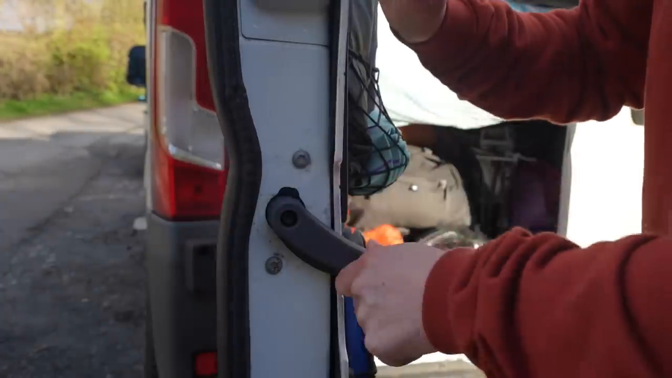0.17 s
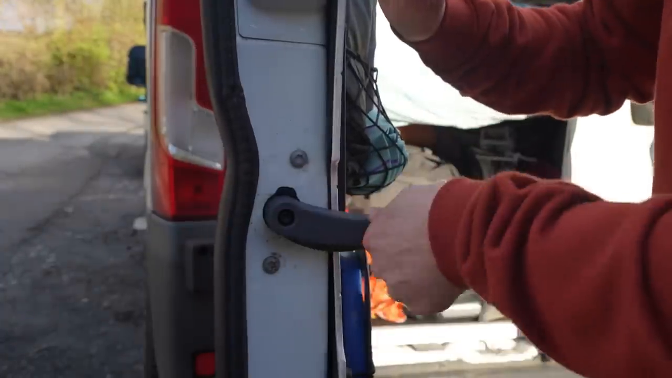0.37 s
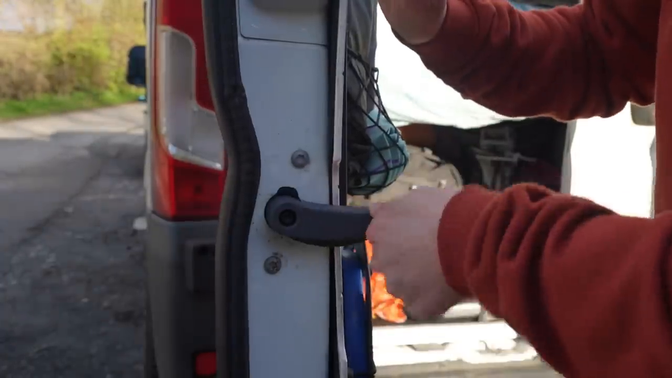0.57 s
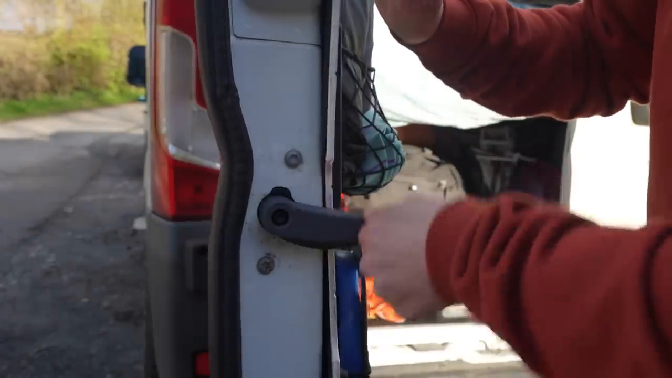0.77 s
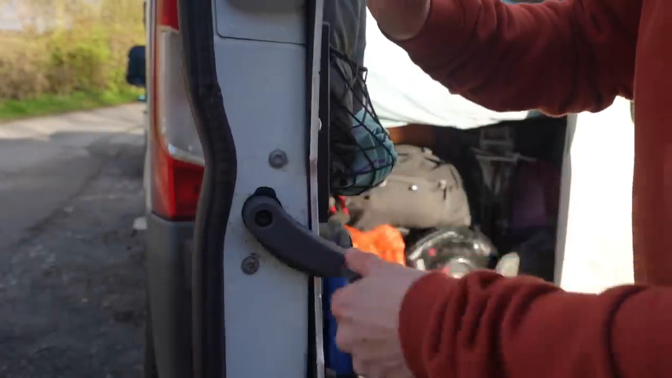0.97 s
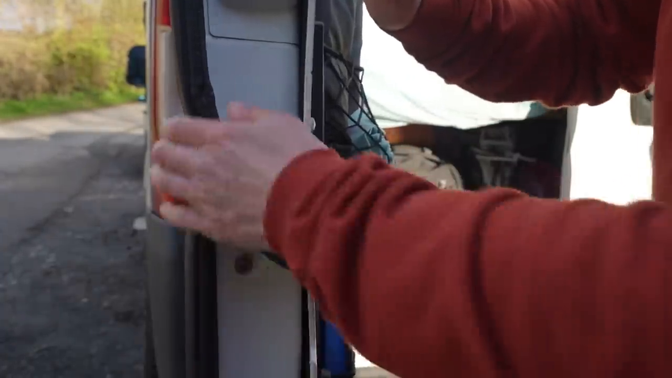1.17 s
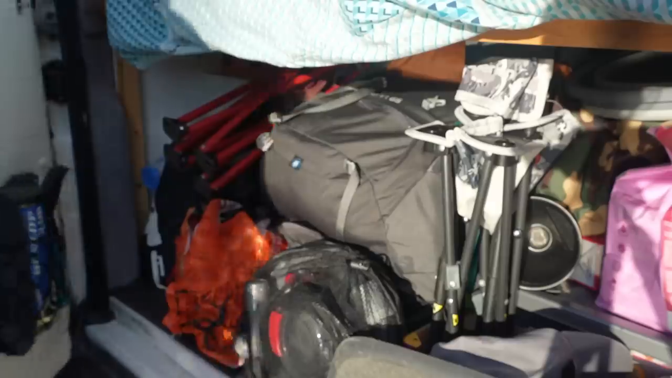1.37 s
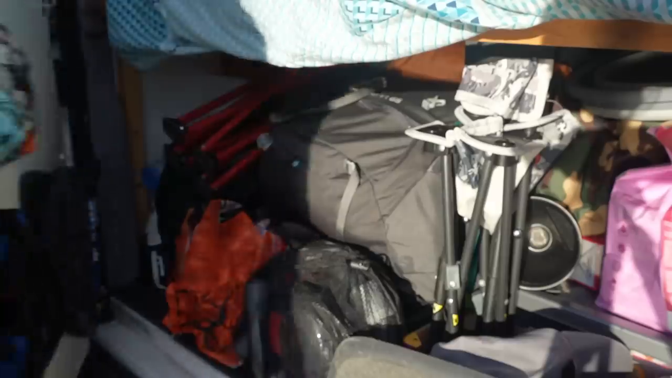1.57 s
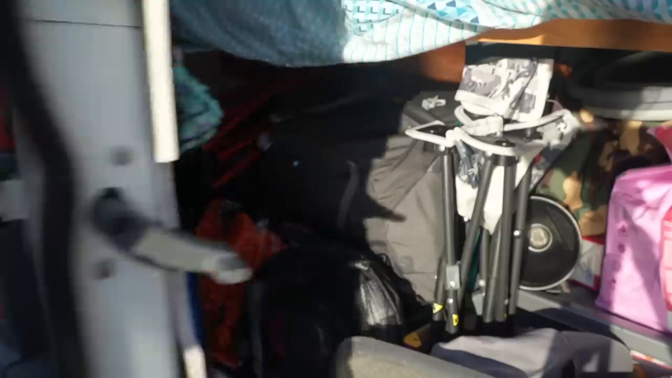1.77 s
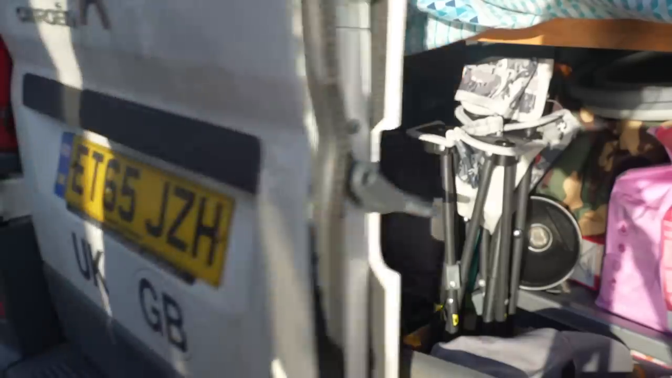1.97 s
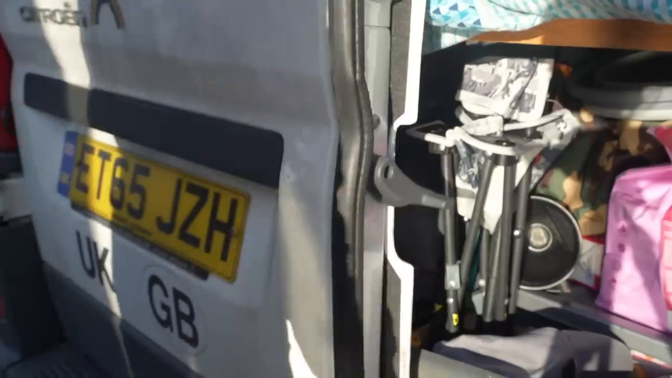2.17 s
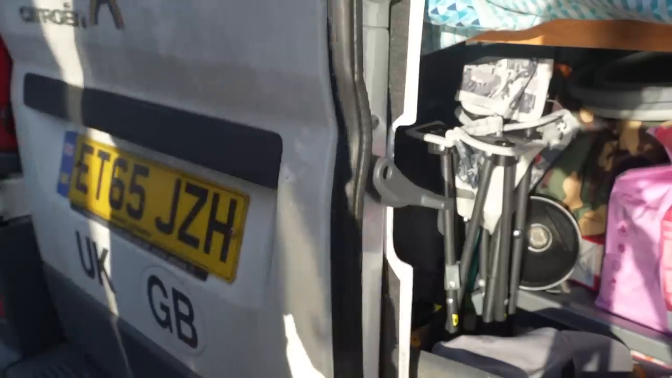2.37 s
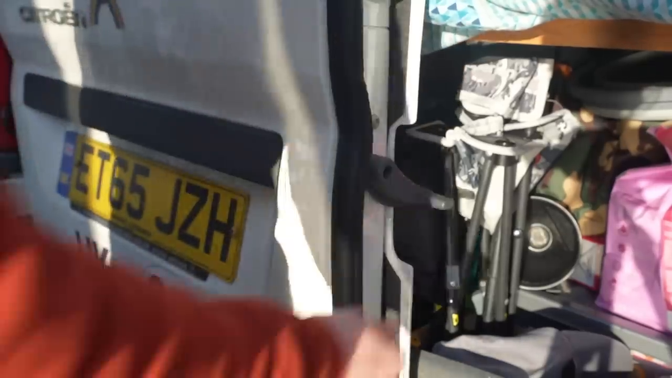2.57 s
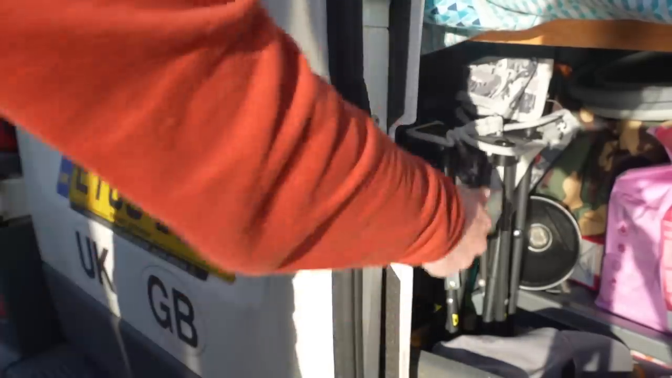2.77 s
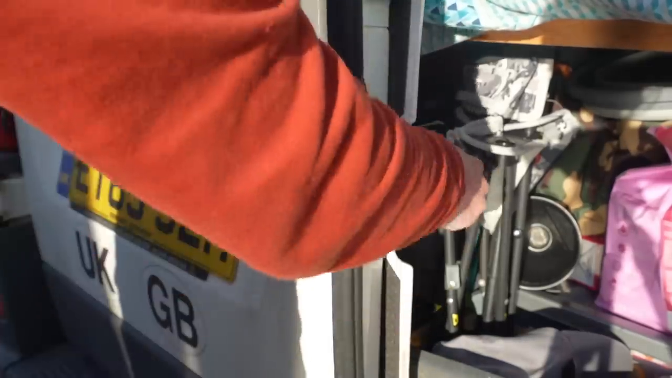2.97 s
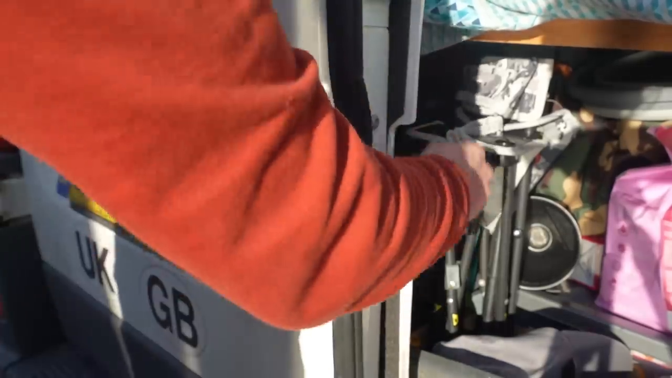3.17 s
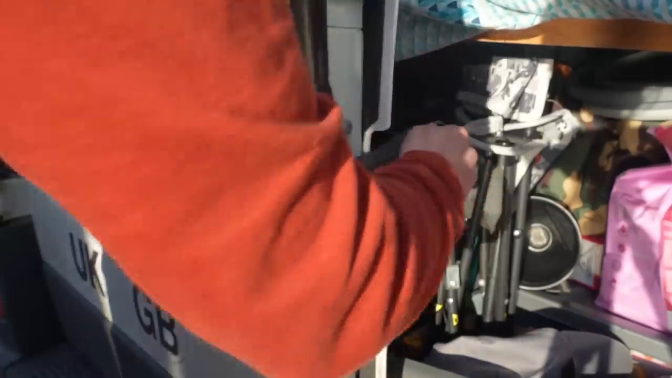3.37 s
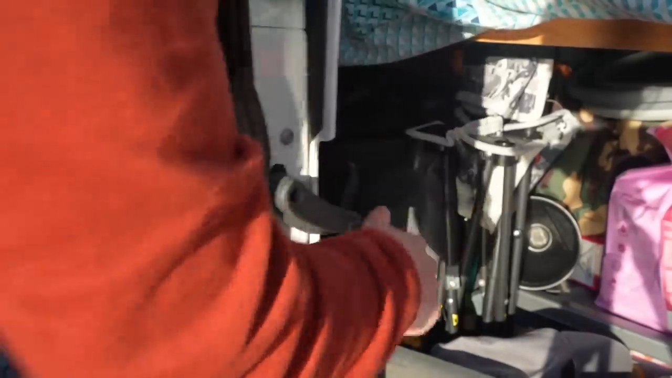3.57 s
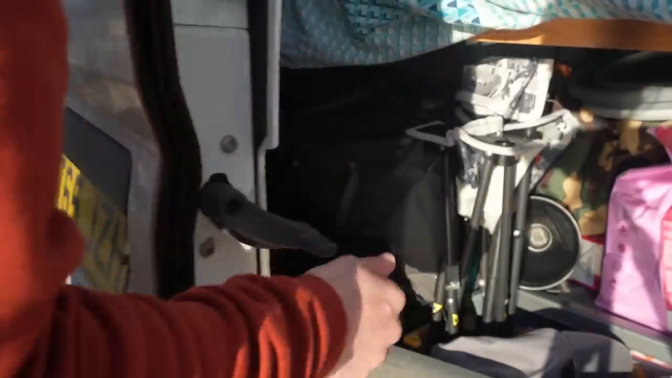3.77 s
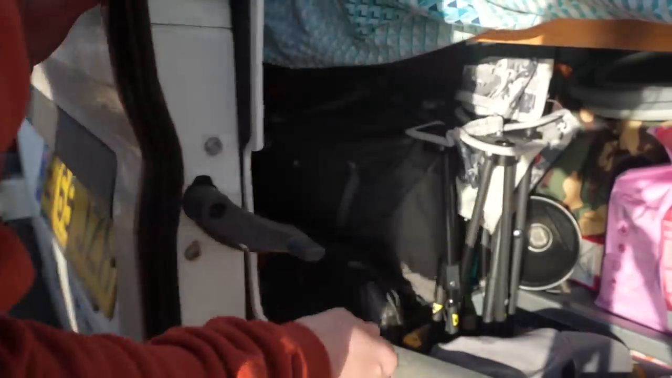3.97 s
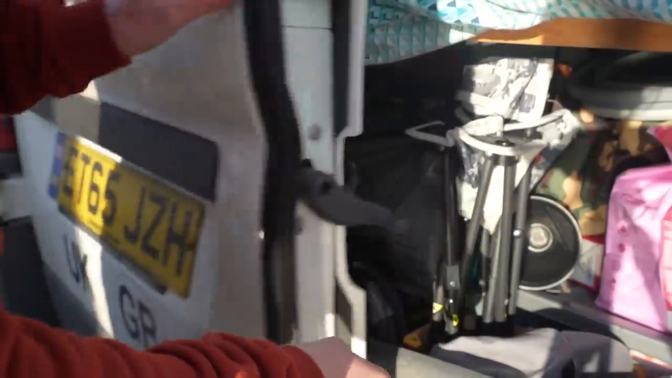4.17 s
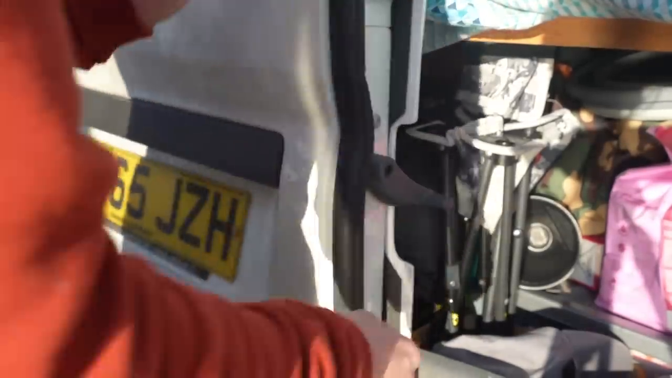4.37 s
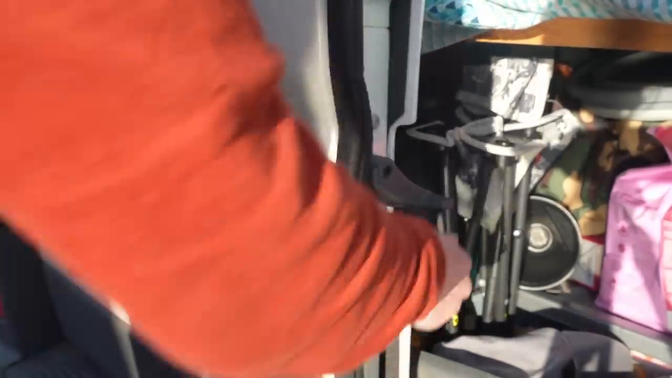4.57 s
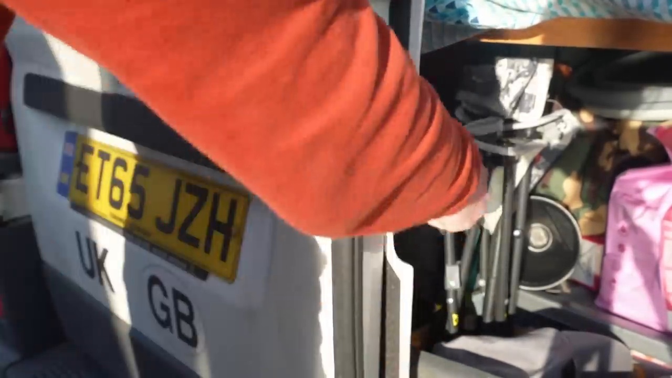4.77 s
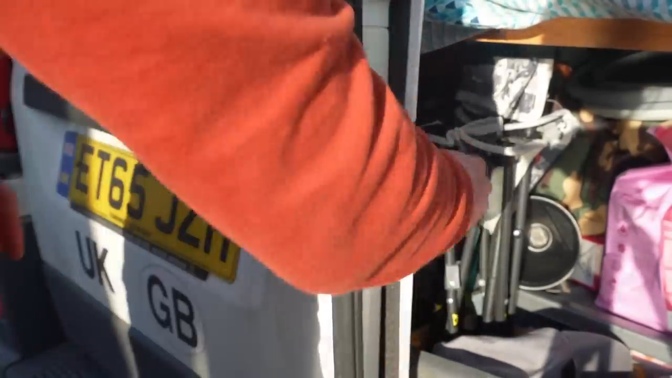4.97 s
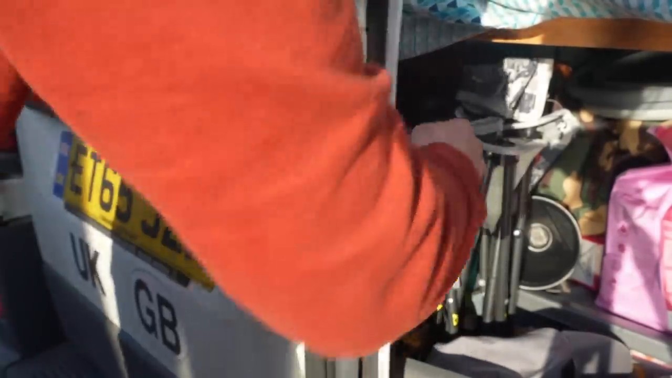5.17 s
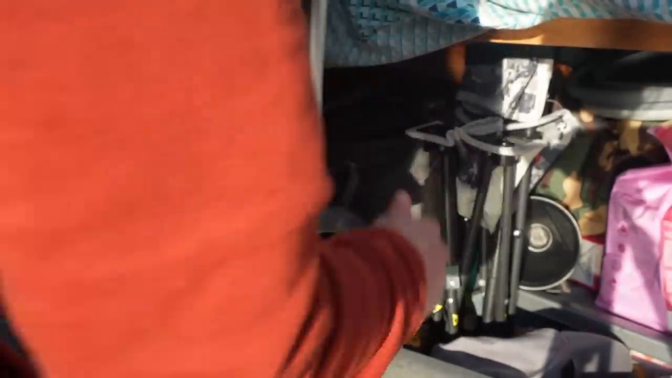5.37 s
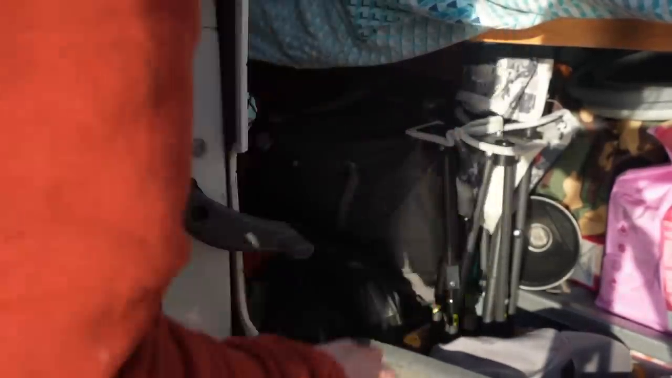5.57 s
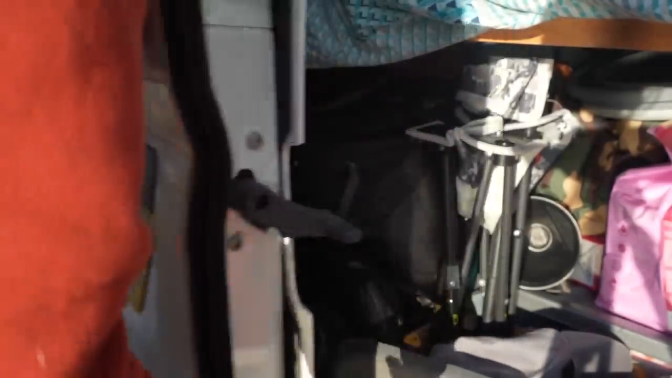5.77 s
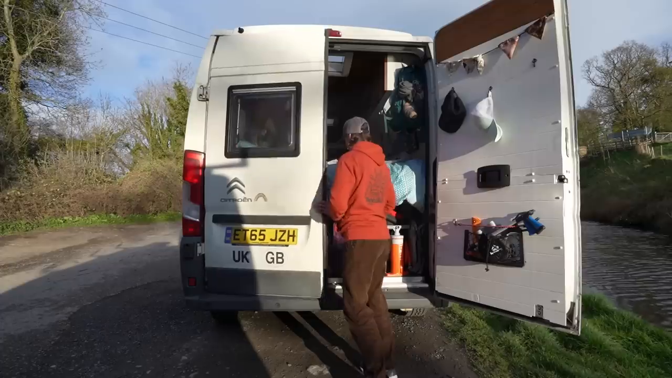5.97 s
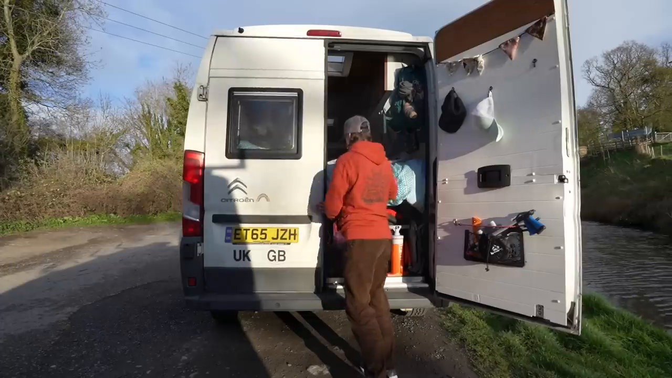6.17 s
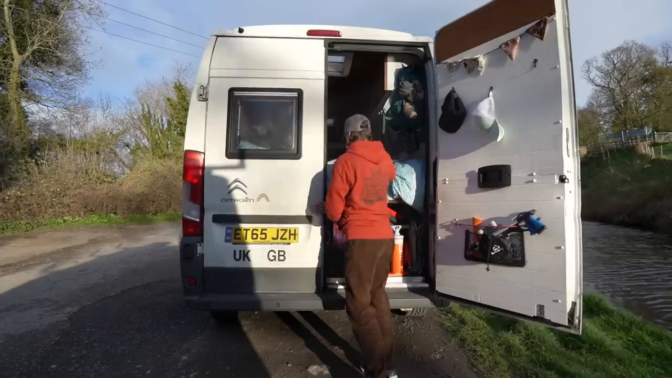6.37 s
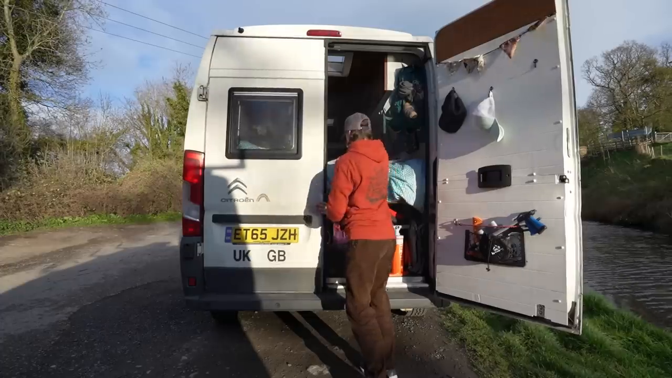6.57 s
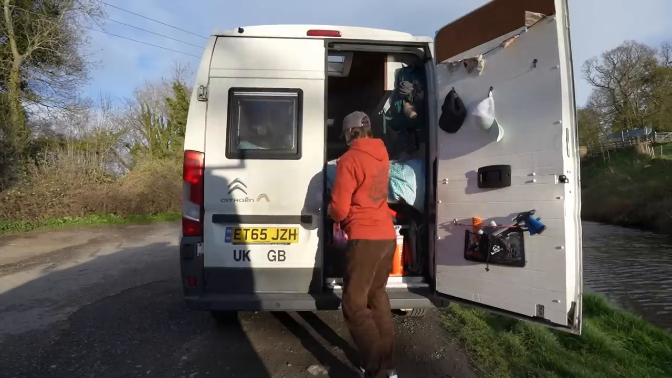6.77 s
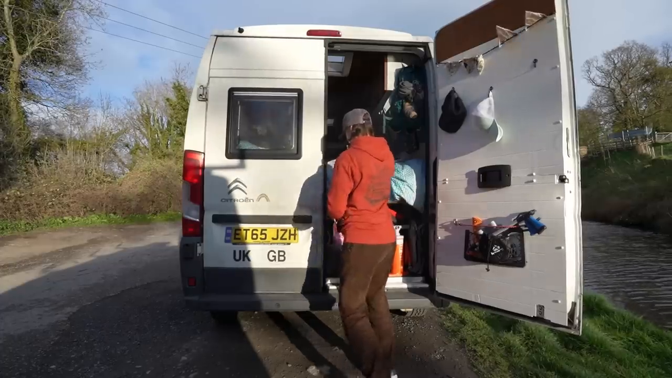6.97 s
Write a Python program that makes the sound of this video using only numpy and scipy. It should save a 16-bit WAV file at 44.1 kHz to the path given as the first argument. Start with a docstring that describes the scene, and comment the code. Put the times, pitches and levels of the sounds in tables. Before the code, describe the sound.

From 0 to 1.3 s, lumpy wind rumbles on the microphone over soft outdoor wash, strongest after 0.9 s, while a van's rear door handle is worked twice close by: dry metal clicks, small clunks and brief rubs, clearest near 0.35, 0.67 and 0.98 s. The wind cuts dead at about 1.29 s, leaving quiet air and a faint tick at 1.57. At 2.03-2.2 s the door slams hard, a cluster of bright latch cracks, rattle and panel thump. The handle unlatches sharply at 3.22, with looser clunks until 3.6. A second slam hits at 4.3-4.45, followed by another crisp unlatch at 5.08 and softer clacks around 5.35. At 5.92 the airy wash steps up; a farther, duller, boomy slam lands at 6.17-6.33. Faint tinkles follow at 6.42 and 6.95-7.0 s.

```python
"""Gusty wind and a soft outdoor wash come first, and a van's rear door handle is worked twice in them.
The door is then shut, unlatched and shut again, and shut once more from farther off, with a duller slam.
Knocks are chattering noise bursts sent through latch steel and door panel; thumps and snaps are short
dying tones. Moving parts rattle and rub as shaped noise, and wind and wash are coloured noise.
Small metal pieces, each a few high dying tones, tinkle near the end."""
import sys
import numpy as np
from scipy import signal
from scipy.fft import rfft, irfft
from scipy.io import wavfile
from scipy.ndimage import uniform_filter1d

SR = 44100
rng = np.random.default_rng(int(sys.argv[2]) if len(sys.argv) > 2 else 0)


def log_audio(samples):
    """Write samples as a 16-bit WAV file to the path given in sys.argv[1]."""
    # one column per channel
    frames = np.atleast_2d(samples).T
    # limit to full scale, then quantise
    limited = np.clip(frames, -1, 1)
    pcm = np.round(limited * 32767).astype(np.int16)
    wavfile.write(sys.argv[1], SR, pcm)


N = 309713  # length in samples

# ringing tones of the latch steel under a loose contact:
# pitch_hz, level_db (relative), t60_s (time to die by 60 dB)
LATCH_MODES = [(800, 0.5, 0.0097), (1270, -3.5, .022), (1640, -4, 0.018), (2062, 3, 0.016),
               (2330, 1, 0.018), (2850, -2.5, 0.015), (3390, -2.5, 0.018), (4290, -10.5, 0.02),
               (5950, -12.5, .012), (7230, -8.5, .016), (8160, -14, .012), (10240, -17.5, .008)]


def gain_of(db):
    """Turns decibels into an amplitude factor."""
    return 10 ** (np.asarray(db) / 20)


def evened(x):
    """Scales a sound to an rms of 1."""
    return x / np.sqrt(np.mean(x ** 2) + 1e-20)


def read(points, hz):
    """Reads a spectrum between its points, on a log-frequency axis."""
    point_hz, value = np.transpose(points)
    return np.interp(np.log(hz + 1), np.log(point_hz + 1), value)


def add(mix, s, sound):
    """Mixes a sound in at time s, in seconds."""
    part = mix[..., round(s * SR):][..., :sound.shape[-1]]
    part += sound[..., :part.shape[-1]]


def ringing(x, hz, width_hz):
    """One resonance that keeps the power of wide noise: x is shifted to 0 Hz, smoothed, shifted back."""
    turn = np.exp(2j * np.pi * hz * np.arange(len(x)) / SR)
    r = np.exp(-np.pi * width_hz / SR)
    smooth = signal.lfilter([np.sqrt(2 - 2 * r * r)], [1, -r], x / turn)
    return (turn * smooth).real


def coloured(points, extra_db=0):
    """Steady noise shaped to a given spectrum."""
    hz = np.fft.rfftfreq(N, 1 / SR)
    return irfft(rfft(rng.standard_normal(N)) * gain_of(read(points, hz) + extra_db), N)


def wind():
    """Lumpy low turbulence on the microphone; it stops dead at 1.286 s, where a calmer stretch begins."""
    # gusts: start_s, rumble_db, roar_db (relative to the rumble)
    gusts = [(0, -37.5, -15), (.088, -45.5, 0), (.184, -45.5, -10), (.496, -46.5, -1), (.624, -55, -6),
             (.742, -56, -3), (.82, -60, 7), (.876, -34.5, -10), (.97, -29.5, -9), (1.0, -35.5, 5),
             (1.036, -38.5, -2.5), (1.086, -24.5, -12.5), (1.122, -34.5, -4), (1.204, -26.5, -12),
             (1.286, -28.5, -12.5)]
    # colour of the turbulence: pitch_hz, level_db (per Hz, relative)
    rumble_colour = [(8.8, -13), (15, -2.5), (32, 1), (81, 0), (407, -16.5), (471, -26), (498, -23.5),
                     (632, -29.5), (1200, -37), (1560, -75), (2640, -120)]
    s, rumble_db, roar_db = np.transpose(gusts)
    t, hz = np.arange(N) / SR, np.fft.rfftfreq(N, 1 / SR)
    # rumble lies below about 130 Hz, roar above
    low_db = -10 * np.log10(1 + (hz / 130) ** 6)
    high_db = 10 * np.log10(1 - gain_of(2 * low_db) + 1e-9)
    smooth = uniform_filter1d(uniform_filter1d(rng.standard_normal(N), 900), 900)
    lumps = gain_of(3.4 * evened(smooth))
    rumble = evened(coloured(rumble_colour, low_db))
    roar = evened(lumps * coloured(rumble_colour, high_db))
    gust = rumble + roar * gain_of(np.interp(t, s, roar_db))
    stop = np.clip((s[-1] - t) / 0.00069, 0, 1)
    return gain_of(np.interp(t, s, rumble_db)) * gust * stop


def wash():
    """Far traffic and air in leaves: bass, middle and treble of one noise swell a little apart."""
    # wash, with quick steps near 1.285 s and 5.92 s:
    # time_s, level_db, bass_db, treble_db (last two added to level_db)
    swells = [(0, -50, 10, 6), (.4, -54.5, 10, 10), (.75, -53.5, -2, 8.5), (1.284, -53, -8, 7),
              (1.286, -60.5, 2.5, 7), (1.9, -59, 2, 4.5), (2.7, -59.5, 7.5, 6), (3.1, -59, 0.5, 2),
              (3.9, -61, 3, 2.5), (4.951, -60, 8, 4), (5.6, -61.5, 13.5, 1.5), (5.91, -59, 4, -3.5),
              (5.93, -52.5, 2, 5), (6.6, -52, 0, 4), (7.02, -54, 3.5, 8.5)]
    # colour of the wash: pitch_hz, level_db (per Hz, relative)
    wash_colour = [(12, -43), (20, -20), (142, -9.5), (216, -10.5), (234, -10.5), (399, -11), (446, -13),
                   (607, -11), (698, -14.5), (949, -14), (1060, -14.5), (2750, -24.5), (16000, -57.5)]
    s, level_db, bass_db, treble_db = np.transpose(swells)
    t, hz = np.arange(N) / SR, np.fft.rfftfreq(N, 1 / SR)
    spectrum = rfft(evened(coloured(wash_colour)))
    low = 1 / (1 + (hz / 250) ** 4)
    high = 1 - 1 / (1 + (hz / 3500) ** 4)
    bass, middle, treble = (irfft(spectrum * share, N) for share in (low, 1 - low - high, high))
    flutter = gain_of(2.0 * evened(uniform_filter1d(rng.standard_normal(N), 3000)))
    mix = middle + flutter * bass * gain_of(np.interp(t, s, bass_db))
    mix = mix + treble * gain_of(np.interp(t, s, treble_db))
    return gain_of(np.interp(t, s, level_db)) * mix


def causal(db):
    """Unit-energy response that starts at once, from its dB at 4097 evenly spaced frequencies."""
    mirrored_db = np.concatenate([db, db[-2:0:-1]])
    log_gain = np.log(gain_of(np.maximum(mirrored_db, -100)))
    # the Hilbert transform gives the phase that packs the energy at the start
    taps = np.fft.ifft(np.exp(np.conj(signal.hilbert(log_gain)))).real[:4096]
    return taps / np.linalg.norm(taps)


def bodies():
    """Responses of the latch steel (middle, treble) and of the door panel, a sum of dying modes."""
    # colour of the steel's crack: pitch_hz, level_db (per Hz, relative)
    crack_colour = [(180, -29.5), (300, -1.5), (1230, -4.5), (2000, -8), (3580, -11), (4990, -14.5),
                    (6000, -16), (8640, -20.5), (9550, -25.5), (10600, -27), (16000, -32.5)]
    # modes of the door skin: pitch_hz, width_hz (wider dies sooner), level_db (relative, before width scaling)
    panel_modes = [(72, 40, -11.5), (109, 11, -14), (162, 22, -3), (202, 78, 1.5), (234.6, 70, 2.5),
                   (340, 110, 2), (435, 29, 4.5), (497.5, 12, 0.5)]
    hz, t = np.linspace(0, SR / 2, 4097), np.arange(4096) / SR
    split_db = -10 * np.log10(1 + (hz / 5800) ** 8)
    middle = causal(read(crack_colour, hz) + split_db)
    treble = causal(read(crack_colour, hz) + 10 * np.log10(1 - gain_of(2 * split_db) + 1e-9))
    panel = sum(gain_of(db) * width * np.exp(-np.pi * width * t) * np.sin(2 * np.pi * f * t)
                for f, width, db in panel_modes)
    return middle, treble, panel / np.linalg.norm(panel)


def knocks():
    """Each knock is a blow with dying chatter; it drives the steel and rings at the struck part."""
    # knocks of handle and latch: start_s, level_db (relative), treble_db (relative),
    # ring_hz, ring_db (relative)
    knock_table = [(0.043, -24.5, -23, 2280, -14), (0.052, -24.5, -17, 1350, -15),
                   (0.095, -23, -18.5, 1270, -9), (0.128, -39, -39, 1060, 9.5),
                   (0.324, -28.5, -29, 745, -17), (0.349, -28, -24, 1250, -14),
                   (0.36, -27.5, -13.5, 1290, -3), (0.479, -25.5, -53, 1250, -4),
                   (0.619, -30.5, -23, 1430, -8), (0.648, -26.5, -3.5, 1390, -5),
                   (0.666, -21.5, -10, 1270, 7), (0.795, -21.5, -41, 1200, -29),
                   (0.819, -25.5, -16.5, 1210, -8), (0.966, -29, -2, 2230, -10),
                   (0.981, -23.5, -4, 1240, 10.5), (1.124, -34, -25, 950, -10),
                   (1.18, -29.5, -25, 990, -26), (1.57, -44.5, -17, 1050, -9),
                   (1.983, -30.5, -41.5, 716, 1), (2.035, -10.5, -5.5, 1230, -1.5),
                   (2.055, -7.5, -17.5, 1580, -4.5), (2.063, -11, -8, 1430, -6),
                   (2.095, -3, -23.5, 2700, -7), (2.102, -12, -20.5, 935, -8),
                   (2.117, -4.5, -14, 1950, -22), (2.136, -17, -28.5, 1030, 2.5),
                   (2.169, -24, -53, 1820, 7), (2.183, -5.5, -30, 2970, -5), (2.188, -11.5, -37, 2900, -1),
                   (2.273, -26, -35, 816, -26), (2.322, -27.5, -43, 1410, -10),
                   (2.863, -48.5, -9, 2320, 2.5), (2.931, -31.5, -21, 2180, -4.5),
                   (3.015, -32, -13.5, 1410, -6.5), (3.175, -25, -15, 1440, -5),
                   (3.216, -8.5, -12, 2060, -1.5), (3.234, -4, -7.5, 1910, 3), (3.299, -39, -15, 1000, -8),
                   (3.376, -37, -31, 789, 2), (3.399, -26, -47, 1045, -5), (3.428, -24, -56, 1120, 5),
                   (3.475, -30.5, -38, 880, -4.5), (3.529, -26, -45, 900, -5),
                   (3.536, -15.5, -23.5, 1560, -13), (3.562, -15.5, -26, 1470, -19),
                   (3.574, -15, -8.5, 1044, 0), (3.673, -29, -53.5, 750, -3),
                   (4.003, -39.5, -13.5, 2610, -1.5), (4.236, -36, -42.5, 757, 2),
                   (4.26, -32, -13.5, 1720, -14), (4.3, -12, -11.5, 2280, -3),
                   (4.335, -7.5, -12.5, 1460, -8), (4.366, -14, -16, 1870, -11.5),
                   (4.386, -6.5, -21, 2400, -8), (4.401, -14, -30, 703, -1), (4.441, -18.5, -19, 995, -2),
                   (4.477, -16, -41, 1540, -10), (4.503, -40.5, -14, 1040, -14),
                   (4.545, -28, -46, 1375, -1.5), (4.805, -29, -19.5, 711, -17.5),
                   (4.85, -35, -14.5, 1450, -6.5), (5.004, -33, -31.5, 856, -6),
                   (5.073, -8.5, -12.5, 2600, -1.5), (5.092, -3.5, -9.5, 1980, 3), (5.2, -28, -35, 740, -7),
                   (5.251, -29.5, -66, 860, 0), (5.32, -40.5, -24, 1260, 4), (5.343, -16.5, -30, 1260, -16),
                   (5.382, -22.5, -12.5, 1440, -3), (5.394, -22.5, -4.5, 1110, 5.5),
                   (5.675, -44, -15, 880, -5.5), (6.083, -52, -7.5, 800, -11.5),
                   (6.118, -34.5, -40, 711, 2), (6.173, -20, -3.5, 990, 3), (6.19, -4.5, -28, 710, -8),
                   (6.2, -21.5, -2, 730, 12), (6.236, -25.5, -5, 704, 13), (6.256, -3, -29, 970, -16),
                   (6.325, -12, -26, 900, -15.5), (6.473, -43, -41, 715, 5.5), (6.785, -46, -14, 780, -5),
                   (6.799, -43, -10.5, 800, -10), (7.015, -44, -9, 800, -10)]
    fade_s = 0.052  # the chatter's drag falls 75 dB in this time
    drive, own, t = np.zeros((3, N)), np.zeros(N), np.arange(5000) / SR
    noises = rng.standard_normal((len(knock_table), len(t)))
    for (s, level_db, treble_db, ring_hz, ring_db), noise in zip(knock_table, noises):
        drag = noise * gain_of(-75 * t / fade_s) * (1 - np.exp(-t / 0.00069))
        # hard steel on steel is bright
        crack = signal.lfilter([1, -.7], [1], noise * np.exp(-t / 0.00013))
        chatter = (drag + 6.0 * crack / np.linalg.norm(crack)) * 0.34 * gain_of(level_db)
        # a knock with little treble also has a dull middle
        cutoff_hz = 9000 * gain_of(.5 * (np.clip(treble_db, -50, -10) + 6))
        soft = np.exp(-2 * np.pi * cutoff_hz / SR)
        dulled = signal.lfilter([1 - soft], [1, -soft], chatter)
        # treble dies sooner
        bright = chatter * gain_of(treble_db + 6.5 - 30 * t / fade_s)
        add(drive, s, np.array([dulled, bright, 0.2 * dulled]))
        # the first contact sets the ring off cleanly
        blow = (t == 0) * 2.0 * gain_of(level_db)
        touch = dulled + signal.lfilter([1 - soft], [1, -soft], blow)
        # a plate's next mode joins in
        pair = ringing(touch, ring_hz, 190) + 0.29 * ringing(touch, 1.6 * ring_hz, 270)
        add(own, s, gain_of(ring_db) * pair)
    return drive, own


def steel(blows):
    """Knocks leave the latch steel free, so all its modes ring longer than under a loose contact."""
    times_longer, level_db = 6.5, -15
    t = np.arange(6000) / SR
    modes = sum(gain_of(db - 60 * t / (times_longer * t60)) * np.sin(2 * np.pi * hz * t)
                for hz, db, t60 in LATCH_MODES)
    return gain_of(level_db) * signal.oaconvolve(blows, modes / np.linalg.norm(modes))[:N]


def thumps():
    """Door skin or pushed air: a few cycles, swelling within a cycle, beside a weaker neighbour mode."""
    # dull thumps of the door skin; the 60 Hz ones are air pushed by the slams:
    # start_s, level_db (relative), pitch_hz
    thump_table = [(0.676, -21.5, 305), (0.328, -39, 500), (0.682, -25, 520), (0.797, -33, 600),
                   (0.991, -26, 299), (1.983, -37.5, 220), (2.056, -10, 158), (2.07, -24.5, 62),
                   (2.095, -9.5, 230), (2.102, -6, 380), (2.139, -16.5, 227), (2.189, -29, 242),
                   (2.359, -35, 216), (3.179, -31.5, 286), (3.219, -20.5, 146), (3.234, -32, 137),
                   (3.397, -32.5, 245), (3.428, -31.5, 248), (3.474, -45, 223), (3.532, -24.5, 272),
                   (3.579, -22, 287), (3.605, -30.5, 266), (4.309, -30.5, 489), (4.32, -23.5, 60),
                   (4.33, -16.5, 158), (4.378, -22, 100), (4.378, -14.5, 201), (4.602, -36, 441),
                   (4.631, -35, 205), (4.805, -28.5, 551), (5.006, -30, 299), (5.074, -19.5, 148.5),
                   (5.094, -21.5, 493), (5.344, -25.5, 272), (5.399, -31.5, 353), (5.456, -30, 117),
                   (6.193, -14.5, 425), (6.2, -31, 60), (6.214, -23, 302), (6.228, -28, 245),
                   (6.255, -9, 503), (6.329, -19, 406), (6.474, -34, 415)]
    out, t = np.zeros(N), np.arange(6000) / SR
    draws = rng.random((len(thump_table), 2))
    for (s, level_db, hz), (apart, turn) in zip(thump_table, draws):
        # dies by 4.5 dB each cycle
        shape = gain_of(level_db - 4.5 * hz * t) * (1 - np.exp(-hz * t / 0.39)) * 0.94
        neighbour_hz = hz * (1.5 + 0.3 * apart)
        neighbour = np.sin(2 * np.pi * (neighbour_hz * t + turn))
        add(out, s, shape * (np.sin(2 * np.pi * hz * t) + 0.3 * neighbour))
    return out


def rubs():
    """Parts rub in uneven slips, coloured by one gliding resonance; each rub swells and fades."""
    # rubbing parts: start_s, length_s, level_db (before the swell), start_hz, end_hz,
    # width_hz (of each of two passes)
    rub_table = [(0.471, 0.031, -46, 1280, 1280, 100), (0.627, 0.05, -44, 1300, 1350, 350),
                 (.8, 0.057, -46.5, 1260, 1290, 200), (0.945, 0.039, -41, 1300, 1350, 350),
                 (1.119, 0.11, -50, 2400, 2620, 1210), (1.945, 0.067, -56, 2470, 3200, 1500),
                 (3.435, 0.11, -64.5, 2370, 2570, 1490), (3.615, 0.057, -59.5, 2600, 2600, 1800),
                 (4.19, 0.064, -57.5, 1740, 1450, 250), (4.223, 0.024, -55, 1454, 2010, 249),
                 (5.26, .075, -56, 2760, 3020, 1980)]
    out, t = np.zeros(N), np.arange(SR // 4) / SR
    noises = rng.standard_normal((len(rub_table), 2, len(t)))
    for (s, length, db, from_hz, to_hz, width_hz), noise in zip(rub_table, noises):
        u = np.clip(t / length, 0, 1)
        slips = noise[0] * gain_of(2.7 * evened(uniform_filter1d(noise[1], 150)))
        # the running mean of the pitch makes the glide
        hz = np.cumsum(from_hz + (to_hz - from_hz) * u) / np.arange(1, len(t) + 1)
        rub = evened(ringing(ringing(slips, hz, width_hz), hz, width_hz))
        add(out, s, gain_of(db) * np.sin(np.pi * u) ** 0.79 * rub)
    return out


def movements():
    """Levels of rattle, its treble and the panel boom: each movement rises, holds and falls away."""
    # movements of latch and door: start_s, length_s, rattle_db (relative),
    # change_db (over the length), boom_db (relative)
    moves = [(0.639, .035, -39, -7, -46), (0.789, 0.031, -43.5, 0.5, -40), (.925, 0.047, -54, 3, -53),
             (0.965, 0.025, -29.5, -15, -38), (1.026, 0.23, -62, 10.5, -54), (1.961, 0.1, -53, -2, -60.5),
             (2.031, 0.046, -23, -3, -28), (2.083, 0.061, -27, 0.5, -25), (2.159, 0.033, -30.5, 2, -33),
             (2.222, 0.15, -56, -13.5, -50), (2.62, 0.44, -75.5, -1, -68), (3.213, 0.036, -29, 3, -35.5),
             (3.274, 0.16, -55, -6, -52), (3.455, 0.14, -54, 4, -49), (3.62, 0.059, -59, -8, -56),
             (4.211, 0.099, -56, -4.5, -58.5), (4.298, 0.05, -26.5, 0, -31), (4.361, 0.019, -27.5, -2, -27),
             (4.387, 0.018, -28, -3.5, -27.5), (4.403, 0.068, -32, -5.5, -38),
             (4.508, 0.13, -59.5, -5, -56), (5.005, .06, -61, -12, -50.5), (5.068, 0.038, -28, 2.5, -35.5),
             (5.144, 0.079, -57, 2.5, -48.5), (5.251, 0.17, -57.5, 10, -49),
             (5.44, 0.056, -77.5, -8, -53.5), (6.17, 0.039, -22, -10.5, -22.5),
             (6.208, 0.063, -35, 11, -20.5), (6.282, 0.061, -32.5, -5.5, -38.5),
             (6.35, 0.16, -54, -10.5, -51)]
    rise_s, fall_db_per_s = 0.004, 899.5  # the rattle starts fast and stops soon
    boom_rise_s, boom_fall_db_per_s = 0.02, 448.5  # the panel is slower both ways
    level, t = np.zeros((3, N)), np.arange(SR // 2) / SR
    for s, length, rattle_db, change_db, boom_db in moves:
        after = np.maximum(t - length, 0)
        db = rattle_db + change_db * np.clip(t / length, 0, 1) - fall_db_per_s * after
        # gentle movements are duller; a -25 dB rattle has its treble at -38.5 dB
        treble_db = -38.5 + 1.5 * (db + 25)
        rise = np.clip(t / rise_s, 0, 1)
        swell = np.clip(t / boom_rise_s, 0, 1)
        boom = swell * gain_of(boom_db - boom_fall_db_per_s * after)
        add(level, s, np.array([rise * gain_of(db), rise * gain_of(treble_db), boom]))
    return level


def pings(size):
    """Each loose contact briefly rings one of the lower latch modes, a little off pitch."""
    low = 3 * LATCH_MODES[:8]  # three differently detuned copies of eight modes
    part, t, out = rng.integers(0, len(low), N), np.arange(1500) / SR, np.zeros(N)
    detunes = rng.uniform(.85, 1.15, len(low))
    for k, ((hz, db, t60), detune) in enumerate(zip(low, detunes)):
        ping = gain_of(db - 60 * t / t60) * np.sin(2 * np.pi * hz * detune * t)
        out += signal.oaconvolve(size * (part == k), ping / np.sqrt(t60))[:N]
    return out


def rattles():
    """Many tiny contacts of uneven size, over a grinding hiss, while parts slide and settle."""
    # about 800 contacts per second
    struck = rng.random(N) < 800 / SR
    contacts = struck * gain_of(2.8 * np.minimum(rng.exponential(1, N), 4))
    # each contact scratches for a millisecond or two
    clumps = signal.lfilter([1], [1, -.985], contacts)
    grit = evened((1.2 + clumps) * rng.standard_normal(N))
    push = rng.standard_normal(N)
    level = movements()
    grinding = level * np.array([.7 * grit, grit, push])
    return grinding, 0.79 * level[0] * evened(pings(contacts))


def snaps():
    """Steel snaps on steel: a sharp edge and a few clean cycles; softer snaps have a duller edge."""
    # hard snaps: start_s, level_db (relative), pitch_hz
    snap_table = [(.667, -14.5, 1330), (0.9826, -14, 1290), (2.1154, 6.5, 2000), (2.169, -17, 1890),
                  (2.172, -20, 1900), (2.18, -10.5, 1970), (2.183, -18, 3000), (2.189, -8.5, 3020),
                  (3.234, -18, 2170), (3.429, -55, 1230), (4.336, -9.5, 1800), (4.385, 2, 2390),
                  (4.388, -8, 2400), (4.4445, -19.5, 1530), (5.092, -13, 2000), (5.341, -32, 1500),
                  (6.192, -16, 1100), (6.256, -11, 1160)]
    out, t = np.zeros(N), np.arange(600) / SR
    noises = rng.standard_normal((len(snap_table), len(t)))
    for (s, level_db, hz), noise in zip(snap_table, noises):
        edge_hz = 4500 * gain_of(0.3 * min(level_db, 0))
        edge = ringing(ringing(noise * np.exp(-t / 0.00043), edge_hz, 6000), edge_hz, 6000)
        edge = gain_of(5) * edge / np.linalg.norm(edge)
        # dies by 20 dB every 3.2 cycles
        cycles = np.sin(2 * np.pi * hz * t) * gain_of(-20 * hz * t / 3.2)
        add(out, s, gain_of(level_db) * (cycles + edge))
    return out


def door():
    """Blows and grinding sound through steel and panel; the open load bay adds a short dull tail."""
    blows, rings = knocks()
    grinding, pinging = rattles()
    wide = sum(signal.oaconvolve(d, body)[:N] for d, body in zip(blows + grinding, bodies()))
    wide = wide + snaps()
    t = np.arange(SR // 2) / SR
    tail = rng.standard_normal(len(t)) * gain_of(-60 * t / 0.29) * (1 - np.exp(-t / .009))
    tail = signal.lfilter([1], [1, -.85], tail)
    bay = gain_of(-20.5) * signal.oaconvolve(wide, tail / np.linalg.norm(tail))[:N]
    every_part = wide + bay + rings + steel(blows[0]) + pinging + thumps() + rubs()
    # a low cut at 60 Hz thins the deepest bass of the door
    low_cut = signal.butter(4, 60, "high", fs=SR, output="sos")
    return signal.sosfilt(low_cut, every_part)


def tinkles():
    """Small loose metal pieces ring thinly: each tinkle is a few high modes dying away."""
    # tinkles: start_s, piece (number in the next table), level_db (relative)
    tinkle_table = [(6.424, 0, -52), (6.942, 1, -70), (6.96, 1, -55.5), (6.98, 1, -63), (7.01, 1, -61)]
    # modes of each piece: pitch_hz, level_db (relative), t60_s (time to die by 60 dB)
    pieces = [
        [(4180, -2.5, 0.18), (8000, -11, 0.087)],
        [(10200, -3, 0.069), (12300, -3, 0.14), (15500, -9.5, .17)],
    ]
    out, t = np.zeros(N), np.arange(6000) / SR
    for s, piece, db in tinkle_table:
        modes = sum(gain_of(mode_db - 60 * t / t60) * np.sin(2 * np.pi * hz * t)
                    for hz, mode_db, t60 in pieces[round(piece)])
        add(out, s, gain_of(db) * (1 - np.exp(-t / .001)) * modes)
    return out


def scene():
    """Door, wind, wash and tinkles add up in one channel."""
    return (door() + wind() + wash() + tinkles())[None]


def record(dry):
    """Peaks are softly limited at .85; then a filter removes the sound above 15.9 kHz."""
    rounded = .85 * np.tanh(dry / .85)
    band_limit = signal.firwin(511, 15900, window=("kaiser", 9), fs=SR)
    return signal.oaconvolve(rounded, band_limit[None], "same")


dry = scene()
out = record(dry)
log_audio(out)
```